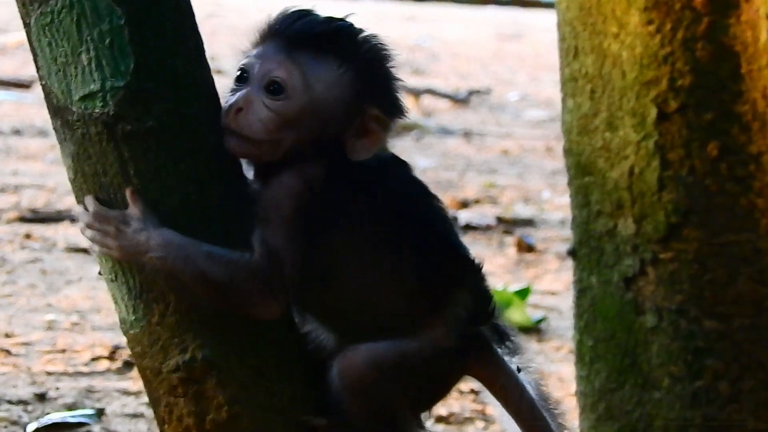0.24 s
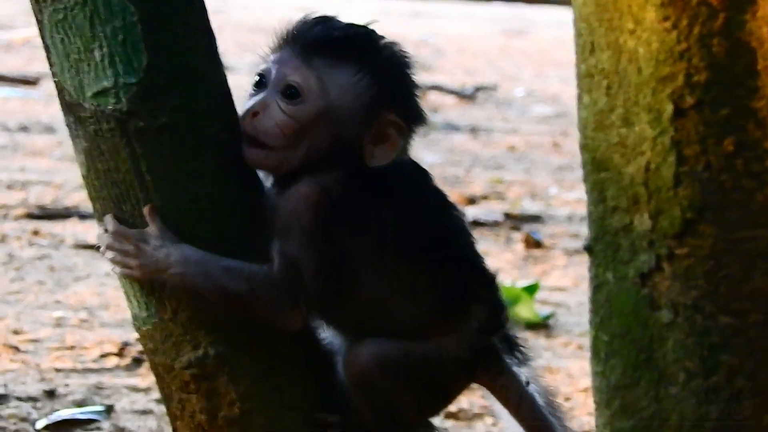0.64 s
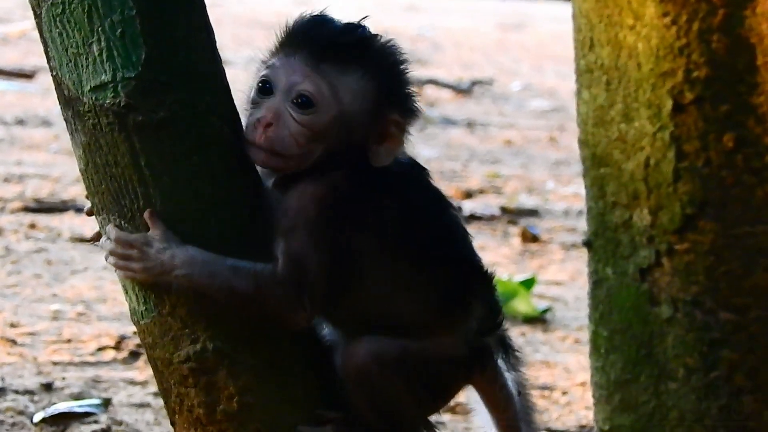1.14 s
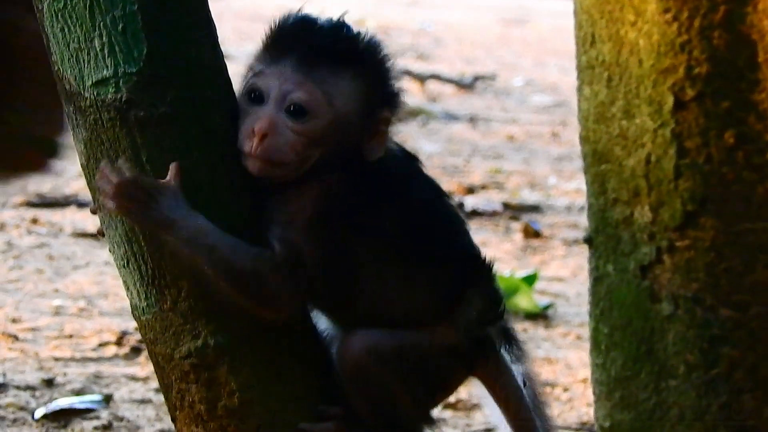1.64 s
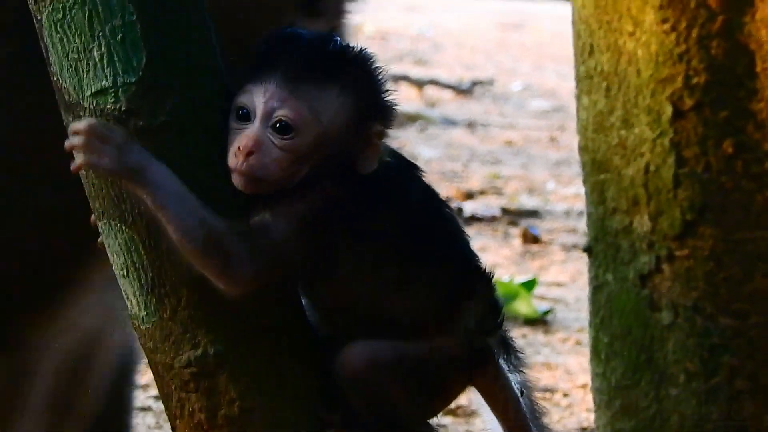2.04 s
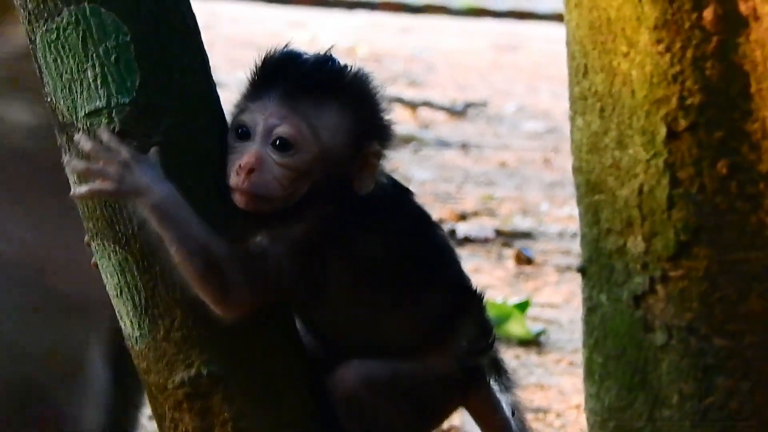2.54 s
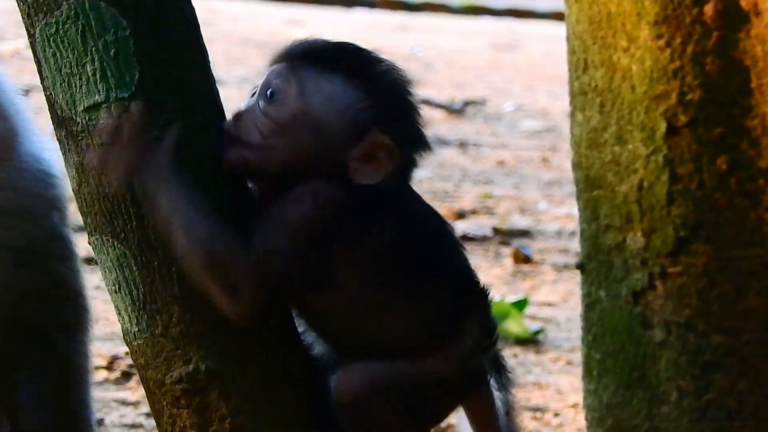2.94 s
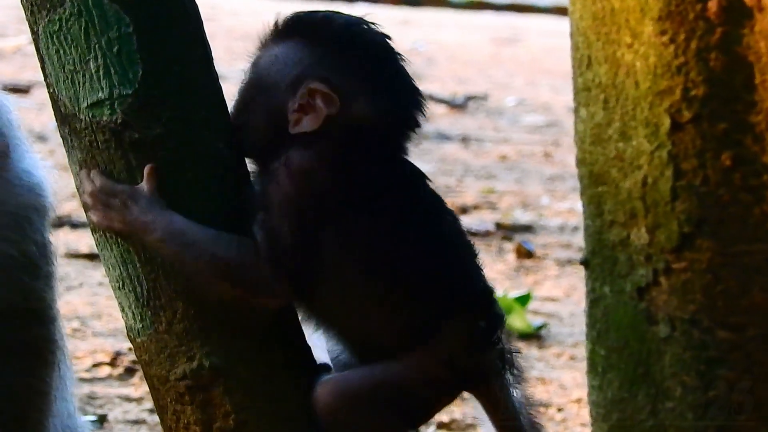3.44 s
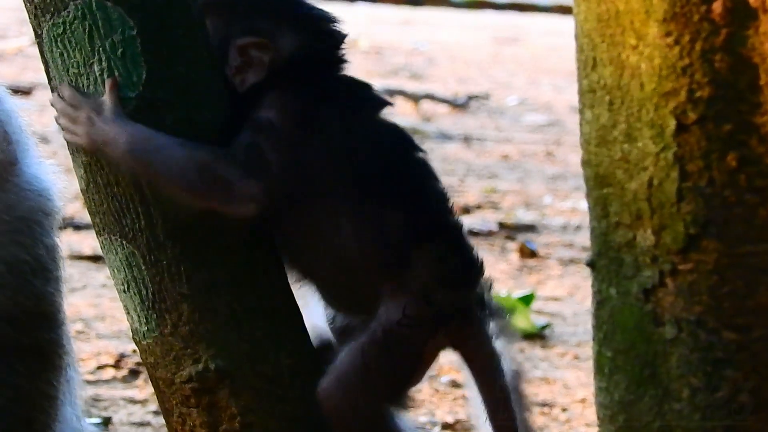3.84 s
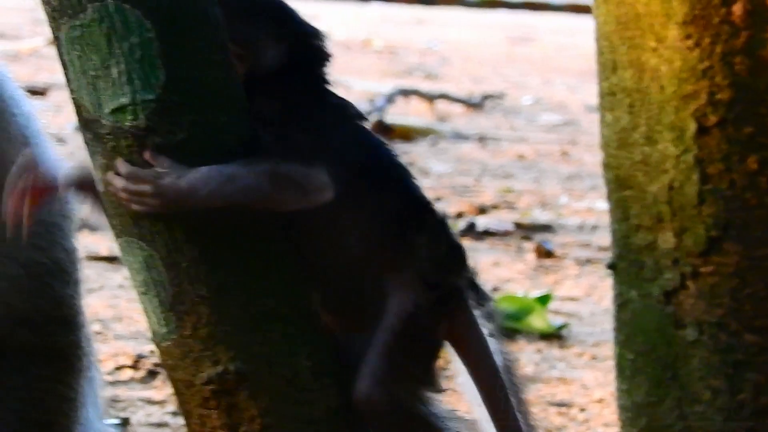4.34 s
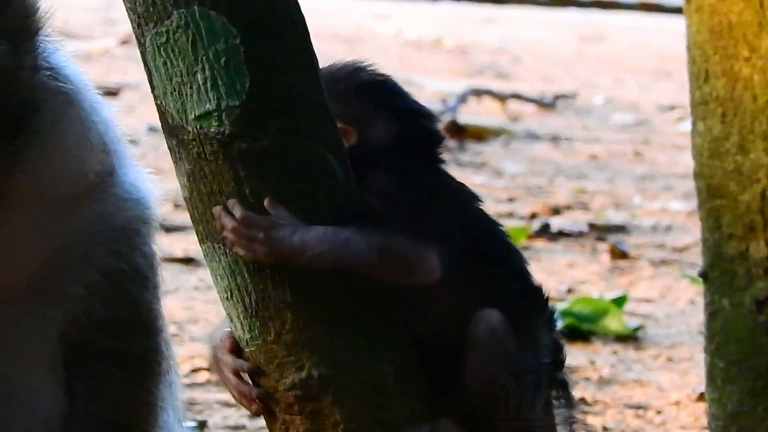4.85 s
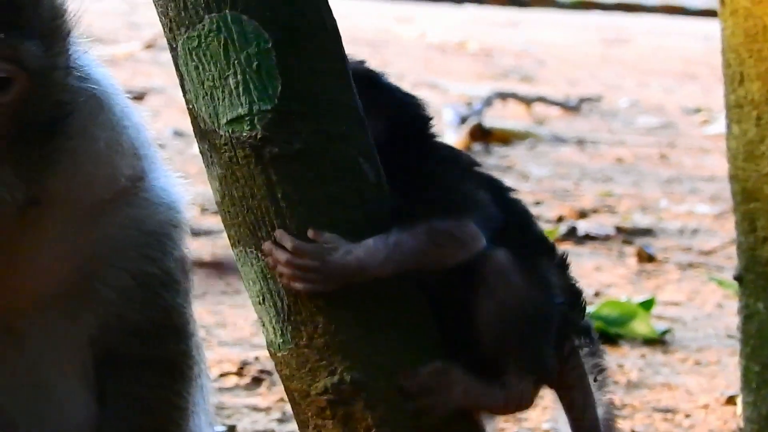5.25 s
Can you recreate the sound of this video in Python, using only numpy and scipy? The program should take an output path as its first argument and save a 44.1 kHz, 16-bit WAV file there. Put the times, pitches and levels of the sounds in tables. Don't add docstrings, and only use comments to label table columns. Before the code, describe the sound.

A dense cicada chorus drones shrilly outdoors, pulsing about six times a second, over faint low traffic rumble and small twig ticks.

```python
import sys
import numpy as np
from scipy import signal
from scipy.fft import rfft, irfft
from scipy.io import wavfile
from scipy.ndimage import uniform_filter1d

SR = 44100
rng = np.random.default_rng(int(sys.argv[2]) if len(sys.argv) > 2 else 0)


def dump_mix(stems):
    frames = np.atleast_2d(stems).T
    limited = np.clip(frames, -1, 1)
    pcm = np.round(limited * 32767).astype(np.int16)
    wavfile.write(sys.argv[1], SR, pcm)


def elevation(decibels):
    levels = np.asarray(decibels, float)
    return 10 ** (levels / 20)


N = 242550


def unit(x):
    return x / np.sqrt(np.mean(x ** 2) + 1e-20)


def in_time(rows):
    s, *columns = np.transpose(rows)
    return [np.interp(np.arange(N) / SR, s, c) for c in columns]


def coloured(x, points):
    bin_hz = np.maximum(np.arange(N // 2 + 1) * SR / N, 1)
    hz, db = np.transpose(points)
    return irfft(rfft(x) * elevation(np.interp(np.log(bin_hz), np.log(hz), db)), N)


def drift(per_s):
    r = np.exp(-2 * np.pi * per_s / SR)
    slow = signal.lfilter([1], [1, -2 * r, r * r], rng.standard_normal(N + SR))
    return unit(slow[SR:])


# frequency in Hz, level under their sum in dB.
PORT_DIFFERENCE = [(60, -54), (110, -55), (200, -28), (380, -16.5), (700, -15.5), (1290, -9.5), (2380, -3),
                   (4400, -3), (8120, -0.5), (15000, -3)]


def diffuse():
    both, apart = rng.standard_normal((2, N))
    return both + coloured(apart, PORT_DIFFERENCE) * [[1], [-1]]


def panned(pan_db):
    return elevation(np.array([pan_db / 2, -pan_db / 2]))


def body(x, modes):
    out = 0
    for k, (hz, width_hz, db) in enumerate(modes):
        r = np.exp(-np.pi * 1.55 * width_hz / SR)
        b = (1 - r * r) / 2 * np.array([1, 0, -1])
        a = [1, -2 * r * np.cos(2 * np.pi * hz / SR), r * r]
        once = signal.lfilter(b, a, x)
        out = out + (-1) ** k * elevation(db) * signal.lfilter(b, a, once)
    return unit(out)


def tymbals(click_hz, spread, sharp, steady, count):
    power = steady
    for _ in range(count):
        rate_hz = click_hz * (1 + spread * rng.standard_normal() + 0.0398 * drift(7.23))
        turns = np.cumsum(rate_hz) / SR + rng.random()
        power = power + np.exp(sharp * (np.cos(2 * np.pi * turns) - 1)) / count
    return np.sqrt(power) * diffuse()


def throb(t, width_s):
    return np.exp(-np.abs(t / width_s) ** 2.6)


# time in s, treble level in dB, middle over treble in dB.
LEFT_BURSTS = [(1.902, -61, 1), (2.077, -60.5, 0.5), (2.227, -56.5, 2), (2.415, -61, 2.5), (2.567, -57, 3),
               (2.741, -57, 2), (2.896, -55.5, 3.5), (3.063, -56.5, 0.5), (3.215, -58, 2), (3.383, -58, 5),
               (3.551, -56.5, 1), (3.705, -57, 3), (3.862, -57, 0.5), (4.016, -56.5, 0.5),
               (4.166, -55.5, -1), (4.325, -57, 0.5)]
CENTRAL_BURSTS = [
    (4.406, -57, -5),
    (4.567, -54.5, -3.5),
    (4.735, -57.5, -4),
    (4.896, -55, -1.5),
    (5.040, -55.5, -3),
    (5.215, -55, -3),
    (5.370, -55, -3),
]
STRAY_BURSTS = [(0.209, -59, 3), (0.454, -64, 1.5), (0.556, -64, 3), (0.698, -64, -5), (1.0, -62, -7),
                (1.166, -56, -8), (1.324, -60, -7), (1.424, -69, 1.5), (1.544, -60, 3), (1.66, -60, 0),
                (3.15, -68, -6), (3.47, -65, -6), (3.64, -59, -9), (3.79, -64, -6), (3.94, -62, -4),
                (4.077, -57, -1.5), (4.283, -56, -8)]
# body note in Hz, left-right in dB, share in the breaks, lag of the break in s.
LEFT_SINGER = (1655, 7.5, 1.05, .008)
CENTRAL_SINGER = (1740, 1.4, 1.0, .018)
STRAY_SINGER = (1610, 2.7, 0.1, 0.036)


def trees():
    choir = ((LEFT_BURSTS, LEFT_SINGER), (CENTRAL_BURSTS, CENTRAL_SINGER), (STRAY_BURSTS, STRAY_SINGER))
    return [(*row, *voice) for rows, voice in choir for row in rows]


def breaks():
    out, t = np.zeros(N), np.arange(N) / SR
    for s, *_, share, lag_s in trees():
        near = slice(round((s - .1) * SR), round((s + .12) * SR))
        out[near] += share * throb(t[near] - s - lag_s, width_s=0.029)
    return out


# time in s, loudness in dB, lean left-right in dB, unison as depth of breaks in dB.
CHOIR = [(0, -51.5, 0, 0.5), (.45, -49.5, -0.5, 0), (.8, -48.5, -2, 1.5), (1.2, -49.5, -1.5, 2),
         (1.9, -48.5, -1.5, 1), (2.45, -48.5, -1, 3), (2.75, -48.5, -0.2, 4.5), (3.06, -47.5, -0.5, 3.5),
         (3.4, -47.8, 0.5, 4), (4.17, -47.5, 0.1, 5), (4.38, -48, -1, 2.2), (4.58, -48, -4, 1.2),
         (4.72, -48, -3, 2.5), (5.0, -48, -4, 2), (5.22, -48, -2.7, 0.5), (5.5, -48, -5.5, 3)]
# frequency in Hz, width in Hz, level in dB.
BELLY_MODES = [(3340, 280, -3.5), (3386, 60, 1), (3517, 91, -2), (3680, 100, -1.5), (3781, 255, -4.5),
               (4360, 400, -14.5)]
UNDERTONE_MODES = [(1726, 106, -3.5), (1816, 115, -7.5), (1606, 244, -4), (1908, 296, -2)]
OVERTONE_MODES = [(5163, 460, 3), (5950, 1050, -5.5), (6780, 850, -2), (8110, 650, -5.5)]
# level over it in dB, share of its swell, dB gained per dB of lean right,
# share of lean, share of breaks, waver in dB.
UNDERTONE_FOLLOWS = (-12, -0.03, 0.36, 0.84, 0.5, 0)
OVERTONES_FOLLOW = (-5.5, -0.2, 0.34, .3, 0.47, 1)


def drone():
    level_db, pan_db, unison_db = in_time(CHOIR)
    sink_db = -unison_db * breaks()
    puffs = tymbals(120.0, spread=0.23, sharp=3.1, steady=2.2, count=5)
    belly_db = level_db + sink_db - 0.04 * drift(5.1) + 0.52
    out = elevation(belly_db) * panned(pan_db) * body(puffs, BELLY_MODES)
    mean_db = level_db.mean()
    for modes, follows in ((UNDERTONE_MODES, UNDERTONE_FOLLOWS), (OVERTONE_MODES, OVERTONES_FOLLOW)):
        over_db, swell, gain, lean, sink, waver_db = follows
        db = mean_db + over_db + swell * (level_db - mean_db) - gain * pan_db + sink * sink_db
        out = out + elevation(db + waver_db * drift(3.6)) * panned(lean * pan_db) * body(puffs, modes)
    return out


# frequency in Hz, width in Hz, level in dB.
SHRILL_MODES = [(12020, 1600, -2), (13100, 450, 1), (14140, 970, 2), (14900, 1400, -0.5), (15600, 1200, -7)]


def shrill():
    swell_start_s, swell_db_per_s = 3.5, 1.3
    level_db = -58 + swell_db_per_s * np.maximum(np.arange(N) / SR - swell_start_s, 0)
    puffs = tymbals(180.0, spread=0.051, sharp=2.5, steady=0.45, count=4)
    return elevation(level_db + 0.82 * drift(5.8)) * panned(3.6)[:, None] * body(puffs, SHRILL_MODES)


# frequency in Hz, level in dB.
FAR_HISS = [(1300, -17), (2500, -1.5), (4600, 4.5), (7400, 0), (9200, 1.5), (10500, 2.5), (12000, 3.5),
            (14000, 1), (15800, -14)]


def far_chorus():
    loss_per_unison = 0.52
    level_db = -50 - loss_per_unison * in_time(CHOIR)[2] + 0.67 * drift(6.3)
    return elevation(level_db) * panned(.2)[:, None] * unit(coloured(diffuse(), FAR_HISS))


# frequency in Hz, level in dB.
LITTER_COLOUR = [(250, -10.5), (450, -5), (800, -1), (1300, -1.5), (2200, 0.5), (4000, -9.5)]
# start in s, hold in s, level in dB.
LITTER_RUSTLES = [(.0, .03, -73), (0.42, 0.2, -71.5), (0.656, 0.31, -73), (1.098, 0.32, -72.5),
                  (1.525, 0.065, -69), (1.84, 0.038, -69.5), (1.97, .27, -74), (2.29, .03, -67.5),
                  (2.677, 0.015, -60.5), (2.743, 0.12, -67), (2.93, 0.052, -76), (3.306, .1, -74),
                  (3.43, 0.078, -66.5), (3.55, 0.26, -73), (4.0, .11, -69), (4.18, 0.058, -71),
                  (4.25, .01, -70), (4.68, 0.11, -71), (4.794, 0.19, -65.5), (4.975, 0.046, -76),
                  (5.25, .08, -77)]


def rustle():
    attack_s, fall_db_per_s, floor_db = 0.017, 157, -79.5
    t, power = np.arange(N) / SR, elevation(2 * floor_db)
    for s, hold_s, db in LITTER_RUSTLES:
        rise = np.clip((t - s) / attack_s + .5, 0, 1)
        fall_db = fall_db_per_s * np.maximum(t - s - hold_s, 0)
        power = power + rise ** 2 * elevation(2 * (db - fall_db))
    grains_per_s = 900
    grains = (rng.random(N) < grains_per_s / SR) * elevation(3.5 * np.minimum(rng.exponential(1, N), 3))
    crackle = unit(uniform_filter1d(grains, 40))
    hiss = diffuse() * (1 + .5 * crackle)
    return np.sqrt(power) * elevation(6.5) * unit(coloured(hiss, LITTER_COLOUR))


# time in s, level in dB.
ROAD_LEVEL = [
    (0, -60),
    (1.6, -60),
    (2.47, -64.5),
    (3.74, -63),
    (3.9, -65.5),
    (4.55, -62),
    (4.64, -58.5),
    (4.96, -63.5),
    (5.1, -58.5),
    (5.5, -61.5),
]
# frequency in Hz, level in dB.
ROAD_RUMBLE = [(15, -41), (30, -19), (50, -4.5), (70, 1), (110, 0.5), (150, -0.5), (172, -9.5),
               (210, -10.5), (340, -13), (600, -15), (800, -25), (1300, -90)]


def road():
    return elevation(in_time(ROAD_LEVEL)[0] - 5.5) * unit(coloured(diffuse(), ROAD_RUMBLE))


# time in s, firings per s.
NEAR_FIRING = [
    (0, 35.6),
    (.8, 36.7),
    (1.6, 37.7),
    (2.4, 38.2),
    (3.4, 39.2),
    (4.35, 40.4),
    (4.65, 34.5),
    (4.9, 32),
    (5.5, 29.5),
]
FAR_FIRING = [
    (0, 52.5),
    (.5, 51.5),
    (.9, 51),
    (1.2, 49),
    (1.7, 43.5),
    (2, 41),
]
# time in s, level in dB.
NEAR_LEVEL = [(0, -71.5), (.8, -70.5), (1.6, -73), (2, -75.5), (2.5, -77), (3.2, -75.5), (3.9, -78),
              (4.4, -77.5), (4.7, -80), (5, -75), (5.5, -80)]
FAR_LEVEL = [
    (0, -76),
    (.5, -75),
    (.9, -74.5),
    (1.3, -69),
    (1.7, -77),
    (1.95, -76.5),
    (5.5, -100),
]
# multiple of the firing rate, level in dB.
NEAR_HARMONICS = [(1, -9), (2, 0), (3, -1), (4, -2), (5, -8), (6, -9), (7, -8), (8, -11), (9, -16),
                  (10, -15)]
FAR_HARMONICS = [(1, -5.0), (2, 0.5), (3, -3.0), (4, -16)]


def engine(speed, loudness, orders, wobble, flutter_db):
    firing_hz = in_time(speed)[0] * (1 + wobble * drift(4.45))
    turns = np.cumsum(firing_hz) / SR
    tones = (elevation(db + flutter_db * drift(2.6)) * np.sin(2 * np.pi * k * turns) for k, db in orders)
    return np.sqrt(2) * elevation(in_time(loudness)[0]) * sum(tones)


# multiple of the body note, width in Hz, level in dB.
BURST_HIGH = [(7, 500, -8.0), (8, 400, 0.5), (9, 520, -1.5)]
BURST_MID = [(4, 450, -4.0), (5, 480, 0.5), (6, 350, -5.0)]


def buzz():
    out, half = np.zeros((2, N)), SR // 12
    t = np.arange(-half, half) / SR
    puffs = tymbals(240.0, spread=0.071, sharp=3.3, steady=0.15, count=2)
    heard = puffs[0] + 0.62 * puffs[::-1]
    for s, treble_db, middle_over_db, tree_hz, pan_db, *_ in trees():
        note_hz = tree_hz + 20 * rng.standard_normal()
        middle_db = treble_db + middle_over_db
        at = round(s * SR)
        span = slice(at - half, at + half)
        blur = 1 + max(note_hz - 1690, 0) / 70
        high = [(k * note_hz, blur * hz, db - (k - 7) * 4.2 * (blur - 1)) for k, hz, db in BURST_HIGH]
        mid = [(k * note_hz, blur * hz, db) for k, hz, db in BURST_MID]
        treble = panned(pan_db)[:, None] * body(heard[:, span], high)
        middle = panned(.3 * pan_db)[:, None] * body(heard[:, span], mid)
        out[:, span] += throb(t, width_s=0.032) * elevation(treble_db + 1.0) * treble
        out[:, span] += throb(t, width_s=0.029) * elevation(middle_db - 1.5) * middle
    return out


# time in s, peak in dB, frequency in Hz, left-right in dB.
TWIG_TICKS = [(0.6241, -42, 665, 1.5), (0.858, -55, 754, -2), (1.526, -58, 627, -0.5),
              (2.205, -49, 353, -1.0), (2.7, -62, 684, -1), (2.851, -53, 1260, 0.5),
              (2.947, -57, 767, -1.0), (3.462, -50, 1320, 0.0), (3.492, -50, 930, 1.0),
              (4.2597, -44.5, 1180, 2), (4.3287, -53.5, 850, 2), (4.3385, -58, 738, -0.5),
              (4.683, -57, 384, -1.0), (5.145, -51, 710, 1)]


def ticks():
    rise_s, t60_s, hollow_ratio, hollow_db = .0003, .009, .62, -13
    out, t = np.zeros((2, N)), np.arange(SR // 10) / SR
    for s, peak_db, hz, pan_db in TWIG_TICKS:
        ring = np.sin(2 * np.pi * hz * t)
        hollow = elevation(hollow_db) * np.sin(2 * np.pi * hollow_ratio * hz * t)
        knock = (1 - np.exp(-t / rise_s)) * elevation(-t / t60_s * 60) * (ring + hollow)
        at = round(s * SR)
        out[:, at:at + len(t)] += elevation(peak_db + 2.5) * panned(pan_db)[:, None] * knock
    return out


def scene():
    insects = drone() + shrill() + far_chorus() + buzz()
    near = engine(NEAR_FIRING, NEAR_LEVEL, NEAR_HARMONICS, wobble=.002, flutter_db=1.3)
    far = engine(FAR_FIRING, FAR_LEVEL, FAR_HARMONICS, wobble=.003, flutter_db=1.3)
    return insects + rustle() + ticks() + road() + near + far


def band_limit(x):
    return signal.sosfilt(signal.butter(12, 16030, fs=SR, output="sos"), x)


def record(dry):
    steep = signal.ellip(12, .3, 70, 15800, fs=SR, output="sos")
    mix = signal.sosfilt(steep, dry)
    return band_limit(mix)


dry = scene()
out = record(dry)
dump_mix(out)
```